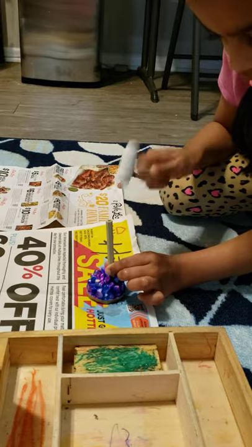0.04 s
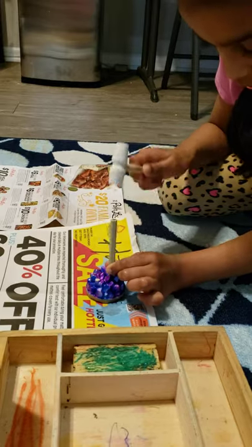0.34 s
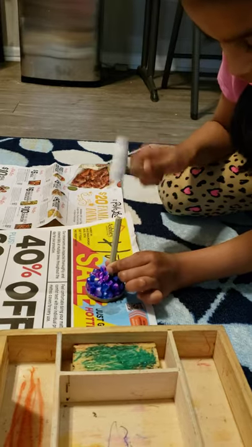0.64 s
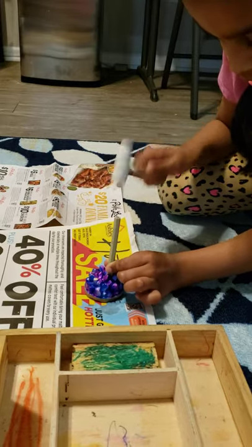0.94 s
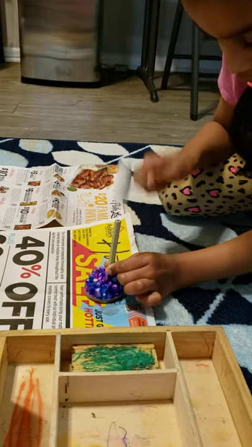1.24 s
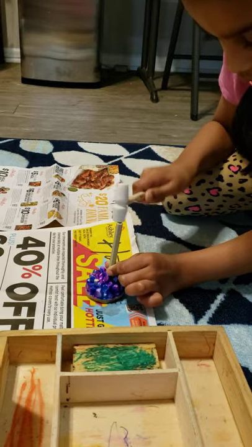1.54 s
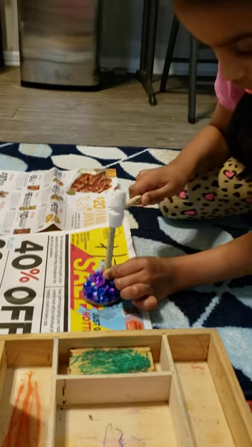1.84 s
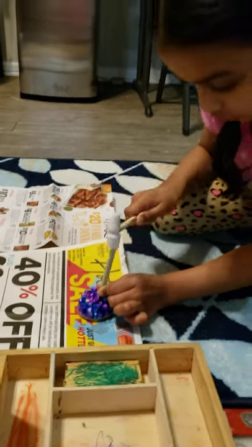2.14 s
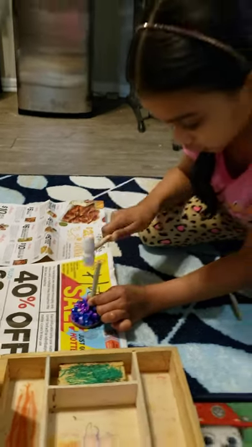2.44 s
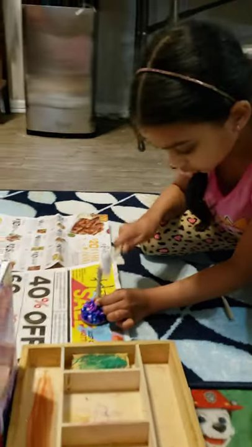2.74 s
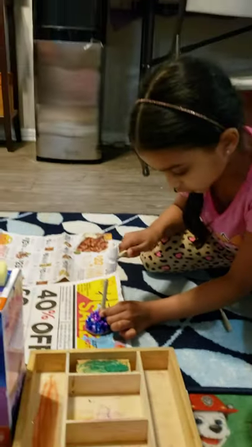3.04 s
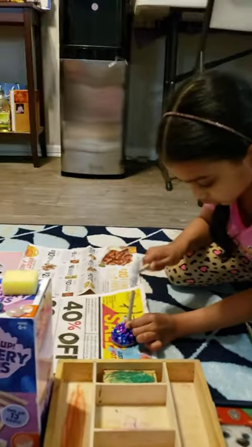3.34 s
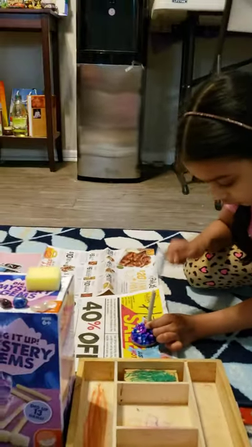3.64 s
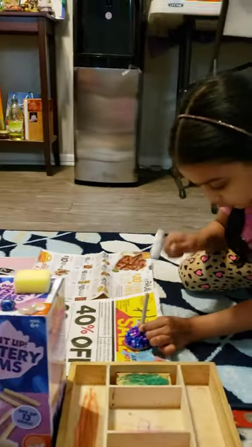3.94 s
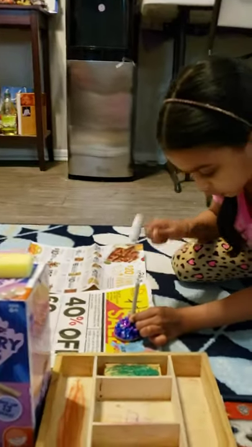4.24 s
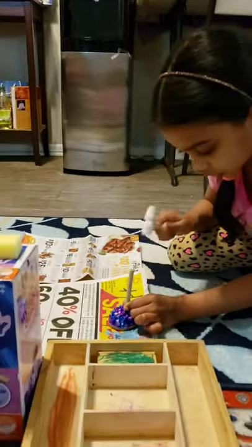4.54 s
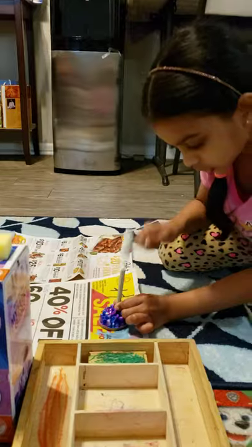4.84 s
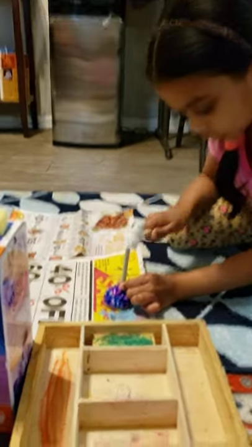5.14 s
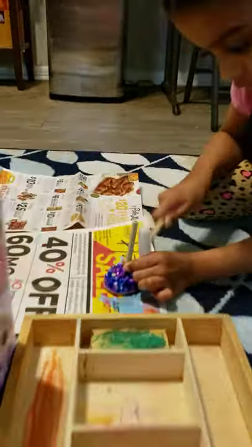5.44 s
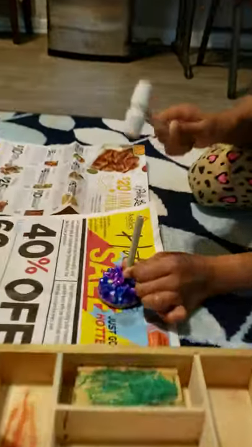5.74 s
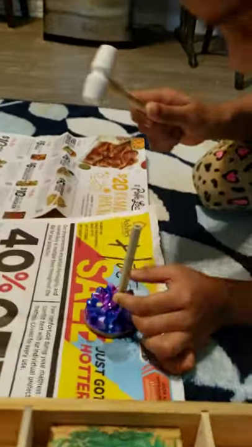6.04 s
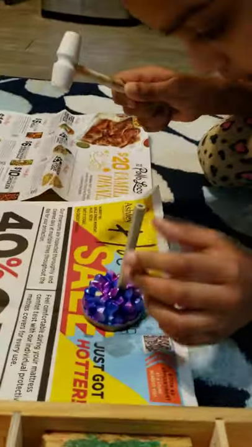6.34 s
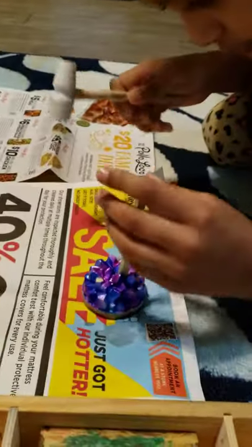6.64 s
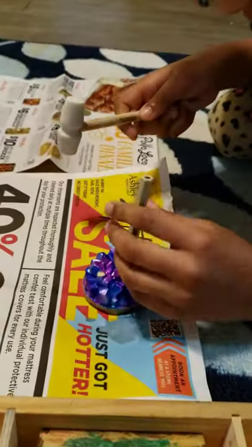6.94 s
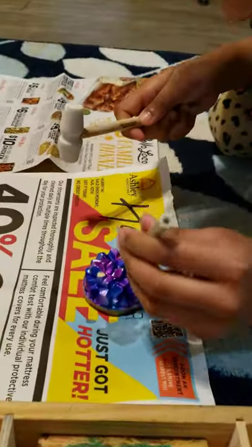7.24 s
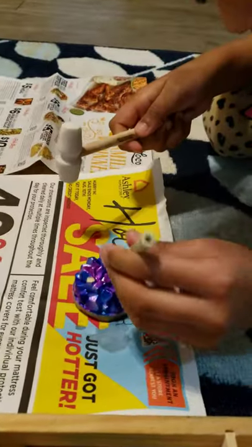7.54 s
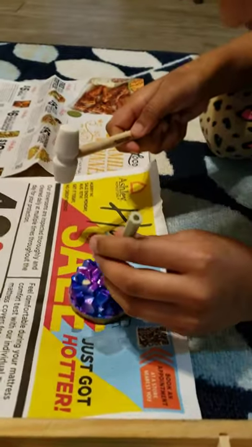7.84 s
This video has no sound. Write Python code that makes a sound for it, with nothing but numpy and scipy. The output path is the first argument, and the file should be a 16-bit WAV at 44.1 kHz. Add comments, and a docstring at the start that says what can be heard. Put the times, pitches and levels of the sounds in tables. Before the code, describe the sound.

Over a low room rumble, quick light knocks come from a small mallet striking a chisel set in clay, with bright ticks, crumbling grit and soft thuds through the floor. After one short break with a sleeve rustle, the steady tapping resumes and ends in a brief chisel rattle. Only quiet touches and scrapes on newspaper remain. The microphone is close, in a home living space with mild reverberation.

```python
"""Over a low room rumble, a small mallet taps a chisel into damp clay lying on newspaper and a rug.
Each impact excites the modes of floor, wooden tools and chisel; crumbs crackle and the living room
reverberates. Between taps the block slides on the paper and sleeves rub. Near 5.5 s the last blow
glances off and the chisel rattles. Then only small handling sounds, cloth and the rumble remain."""
import sys
import numpy as np
from scipy import signal
from scipy.fft import rfft, irfft
from scipy.io import wavfile

SR = 44100
rng = np.random.default_rng(int(sys.argv[2]) if len(sys.argv) > 2 else 0)


def generate_wav(signal):
    """Clip the signal to [-1, 1] and save it as 16-bit WAV at the path in sys.argv[1]."""
    frames = np.transpose(np.atleast_2d(signal))
    scaled = np.clip(frames, -1, 1) * 32767
    pcm = np.round(scaled).astype(np.int16)
    wavfile.write(sys.argv[1], SR, pcm)


N = 352800
TAP_SIZE, TAIL_SIZE = SR // 3, SR // 2   # samples

# Coherence of the diffuse field. Each row: frequency in Hz, left-right correlation.
COHERENCE = [(60, 0.96), (170, 0.97), (350, 0.59), (700, 0.45), (1400, -0.34), (3000, -0.055),
             (16000, -0.006)]


def from_db(db):
    """Amplitude grows tenfold every 20 dB."""
    return 10 ** (np.asarray(db) / 20)


def rms_one(x):
    """Power normalisation: scale to rms 1."""
    return x / np.sqrt(np.mean(x ** 2) + 1e-20)


def unit_blow(x):
    """Energy normalisation: scale to the energy of 10 ms at rms 1."""
    return x / np.sqrt(np.mean(np.sum(x ** 2, axis=-1)) / (.01 * SR) + 1e-20)


def at_hz(points, hz):
    """Interpolation of a table on a logarithmic frequency axis."""
    frequencies, values = np.transpose(points)
    return np.interp(np.log(hz), np.log(frequencies), values)


def panned(sound, pan_db):
    """A level difference gives direction: left exceeds right by pan_db."""
    return sound * from_db(pan_db * np.array([[.5], [-.5]]))


def add(out, s, sound):
    """Superposition: mix in a stereo sound at s seconds, even if it begins before zero."""
    i = round(s * SR)
    out[:, max(i, 0):i + sound.shape[1]] += sound[:, max(-i, 0):N - i]


def resonate(x, resonances):
    """Damped resonators in parallel filter the excitation, their signs alternating."""
    out = 0
    for k, (hz, width_hz, db) in enumerate(resonances):
        b, a = signal.iirpeak(hz, hz / width_hz, fs=SR)
        out = out + (-1) ** k * from_db(db) * signal.lfilter(b, a, x)
    return out


def grains(size, per_s, size_db):
    """Shot noise: independent impulses of random sign, their levels scattered by size_db."""
    born = rng.random(size) < per_s / SR
    strength = from_db(size_db * np.minimum(rng.exponential(1, size), 3))
    return born * strength * rng.choice([-1, 1], size)


def noise_bands(size):
    """A diffuse field is coherent only in the bass: yield (Hz, stereo band) of white noise."""
    edges_hz = np.geomspace(22, 17500, 25)
    mid, side = rfft(rng.standard_normal((2, size)))
    bins = np.arange(len(mid)) * SR / size
    for low, high in zip(edges_hz, edges_hz[1:]):
        hz = np.sqrt(low * high)
        alike = at_hz(COHERENCE, hz)
        pair = np.sqrt((1 + alike) / 2) * mid + np.sqrt((1 - alike) / 2) * side * [[1], [-1]]
        yield hz, irfft(pair * ((bins >= low) & (bins < high)), size)


def coloured_noise(spectrum):
    """A stationary diffuse field: stereo noise of the given spectrum at rms 1."""
    mid, side = rfft(rng.standard_normal((2, N)))
    hz = np.maximum(np.arange(len(mid)) * SR / N, 1)
    alike = at_hz(COHERENCE, hz)
    pair = np.sqrt(1 + alike) * mid + np.sqrt(1 - alike) * side * [[1], [-1]]
    return rms_one(irfft(pair * from_db(at_hz(spectrum, hz)), N))


def background(rumble_db=-57.5, hiss_hz=1880, hiss_width_hz=430, hiss_db=-78):
    """Stationary noise: the broadband rumble of the home and a narrowband appliance hiss."""
    # Each row: frequency in Hz, relative spectral density in dB.
    rumble_spectrum = [(15, -50.5), (25, -41), (48, -10), (61, -2.5), (79, -7.5), (112, -2.5), (270, -24.5),
                       (354, -31.5), (734, -47), (1130, -42), (1290, -51.5), (1740, -25.5), (2760, -59),
                       (6210, -44.5), (9570, -58), (12500, -44), (16000, -68.5)]
    b, a = signal.iirpeak(hiss_hz, hiss_hz / hiss_width_hz, fs=SR)
    white = rng.standard_normal((2, N))
    hiss = rms_one(signal.lfilter(b, a, signal.lfilter(b, a, white)))
    return from_db(rumble_db) * coloured_noise(rumble_spectrum) + from_db(hiss_db) * hiss


def room_tail(build_s=0.0018, ceiling_s=.019, ceiling_width_s=0.003, ceiling_gain=0.56):
    """Reverberation builds up, swells with the ceiling reflection and decays band by band."""
    # Each row: frequency in Hz, reverberant level in dB against the direct sound.
    band_levels = [(80, -4.5), (200, 0), (420, 2), (650, 5.5), (900, -5), (1600, 3.5), (3000, 3.5),
                   (5400, -6), (7500, -2.5), (10000, -3.5), (13000, -1.5), (16000, -4.5)]
    # Each row: frequency in Hz, reverberation time (60 dB of decay) in seconds.
    decay_times = [(100, 0.53), (260, 0.33), (700, 0.41), (1800, 0.44), (4800, 0.44), (8000, 0.33),
                   (13000, 0.31)]
    t, out = np.arange(TAIL_SIZE) / SR, 0
    ceiling = ceiling_gain * np.exp(-((t - ceiling_s) / ceiling_width_s) ** 2)
    shape = (1 - np.exp(-t / build_s)) * (1 + ceiling)
    for hz, band in noise_bands(TAIL_SIZE):
        fade = shape * from_db(-60 * t / at_hz(decay_times, hz))
        out = out + band * fade / np.linalg.norm(fade) * from_db(at_hz(band_levels, hz))
    return out


def some_tail(tails):
    """Echo paths change as hands and microphone move: a random blend of room tails."""
    blend = rng.standard_normal(len(tails))
    return np.tensordot(blend / np.linalg.norm(blend), tails, 1)


def standing_waves():
    """Reflections between floor, walls and furniture reinforce a few room modes."""
    # Each row: frequency in Hz, level in dB against the direct sound, 60 dB decay time in seconds.
    room_modes = [(167.1, -3.5, 0.65), (333, -7.5, 0.28), (493, 11, 0.3), (624, 5, 0.31), (648, 10, 0.17),
                  (826, 2, 0.17), (892, 0, 0.17), (1038, 1, 0.24), (1322, 4, 0.28), (1720, 9, 0.2)]
    t, out = np.arange(TAIL_SIZE) / SR, 0
    for hz, db, t60 in room_modes:
        fade = from_db(-60 * t / t60)
        # the two sides differ more in phase at higher pitch
        phase = rng.uniform(0, 2 * np.pi) + hz / 1000 * rng.standard_normal((2, 1))
        out = out + from_db(db) * 2 * fade / fade.sum() * np.sin(2 * np.pi * hz * t + phase)
    return out


def in_room(sound, tails, pan_db, standing=0):
    """The direct sound adds to its convolution with the room's impulse response."""
    out = signal.fftconvolve(sound, some_tail(tails) + standing, axes=1)
    out[:, :TAP_SIZE] += panned(sound, pan_db)
    return out


def cloth(still_db=-75.5):
    """Friction noise of sleeves and paper: each shift of the body adds power to a faint steady rub."""
    # Each row: peak time in seconds, level in dB, swell and fade times in seconds.
    shifts = [(3.2, -52, 0.11, 0.58), (5.38, -54.5, 0.37, 0.29), (5.85, -66.5, .25, 0.86),
              (7.419, -70, 0.35, 0.13)]
    # Each row: frequency in Hz, relative spectral density in dB.
    friction_spectrum = [(300, -1.5), (1000, -5.5), (2200, 1.5), (3300, -6.5), (5000, -1.5), (7000, 0),
                         (9200, -9.5), (12000, -1.5), (16000, -9.5)]
    t, power = np.arange(N) / SR, from_db(still_db) ** 2
    for s, db, swell_s, fade_s in shifts:
        swell = np.exp(-((t - s) / np.where(t < s, swell_s, fade_s)) ** 2)
        power = power + (from_db(db) * swell) ** 2
    return np.sqrt(power) * coloured_noise(friction_spectrum)


def rubbing(tails):
    """Stick-slip friction: block and fingers slide on paper, their tiny slips driving one resonance."""
    # Each row: start and length in seconds, level in dB, centre and bandwidth in Hz.
    slides = [(1.995, 0.06, -50.5, 1010, 258.5), (1.996, 0.055, -55, 2600, 2486),
              (5.949, 0.064, -66, 4830, 2200), (6.229, 0.082, -66, 7000, 2500),
              (6.282, 0.037, -58.5, 6060, 2500), (7.245, 0.066, -68.5, 4600, 1770),
              (7.327, 0.098, -72.5, 4700, 1500)]
    out = np.zeros((2, N))
    for s, length_s, db, hz, width_hz in slides:
        swell = np.sin(np.pi * np.minimum(np.arange(TAP_SIZE) / SR / length_s, 1))
        slips = rms_one(resonate(grains(TAP_SIZE, per_s=990, size_db=0), [(hz, width_hz, 0)]))
        add(out, s, from_db(db) * in_room(slips * swell * np.ones((2, 1)), tails, pan_db=0))
    return out


def clack(resonances, tails, contact_s, pan_db, crumb_db, crumbs_per_s=700, crumb_fade_s=0.027):
    """Source and filter: a hand-damped body colours a rough contact, falling crumbs and their echoes."""
    t = np.arange(TAIL_SIZE) / SR
    contact = rng.standard_normal((2, TAIL_SIZE)) * t / contact_s * np.exp(-t / contact_s)
    crumbs = grains(TAIL_SIZE, crumbs_per_s, size_db=0.5) * np.exp(-t / crumb_fade_s)
    impact = unit_blow(resonate(contact, resonances))
    crackle = from_db(crumb_db) * unit_blow(resonate(crumbs, resonances))
    body_response = unit_blow(resonate(signal.unit_impulse(TAP_SIZE), resonances))
    room = signal.fftconvolve(some_tail(tails), [body_response], axes=1)[:, :TAIL_SIZE]
    return panned(impact + crackle, pan_db) + room


def handling(tails):
    """Light impacts excite damped resonances: bright in the loose chisel, duller in a soft touch."""
    # The chisel bounces on the clay or shifts in the fingers. Each row: start in seconds, level in dB.
    clicks = [(0.044, -47.5), (0.479, -43.5), (0.748, -38), (2.723, -32.5), (2.727, -36.5), (2.745, -33.5),
              (5.47, -28), (5.481, -33), (5.5454, -36.5), (5.586, -47), (7.129, -66)]
    # Each row: resonance frequency and bandwidth in Hz, relative level in dB.
    loose_chisel = [(3500, 2700, -14.5), (6540, 1000, -3.5), (7330, 390, 4), (11300, 2800, -4.5),
                    (14600, 3200, -12)]
    # Tools and block touch. Each row: start in seconds, level in dB before softening, resonance in Hz.
    touches = [(0.703, -55.5, 625), (5.479, -44, 262), (5.784, -60.5, 385), (6.287, -52.5, 6340),
               (6.29, -67, 800), (7.248, -67, 4370), (7.689, -67.5, 1120)]
    out = np.zeros((2, N))
    for s, db in clicks:
        click = clack(loose_chisel, tails, contact_s=0.00051, pan_db=3, crumb_db=-14.5)
        add(out, s, from_db(db) * click)
    for s, db, hz in touches:
        touch = clack([(hz, hz / 2, 0)], tails, contact_s=0.0011, pan_db=-4.0, crumb_db=-22)
        soften = signal.butter(1, min(2 * hz, SR / 3), fs=SR, output="sos")
        add(out, s, from_db(db) * signal.sosfilt(soften, touch))
    return out


def struck(modes, detune, vary_db, spread_rad, rise_s):
    """Free vibration: modes decay exponentially, and the grip varies their pitch and strength."""
    t, out = np.arange(TAP_SIZE) / SR, 0
    for hz, db, t60 in modes:
        pitch, strength, phase = rng.uniform(-1.14, 1, 3)
        side_phases = spread_rad * phase * np.array([[.5], [-.5]])
        wave = np.sin(2 * np.pi * hz * (1 + detune * pitch) * t + side_phases)
        out = out + wave * from_db(db + vary_db * strength - 60 * t / t60)
    return unit_blow(out * (1 - np.exp(-t / rise_s)))


def floor_thump(cut_hz=100):
    """The floor's modes ring under the rug; so small a patch radiates no deep bass."""
    # Each row: frequency in Hz, relative level in dB, 60 dB decay time in seconds.
    floor_modes = [(111.6, -27, .12), (163.3, 4, 0.029), (167.8, -22.5, 0.26), (235.7, -12, 0.11),
                   (315, -6.5, 0.029)]
    vibration = struck(floor_modes, detune=0.016, vary_db=4.5, spread_rad=0.41, rise_s=0.00019)
    return signal.sosfilt(signal.butter(3, cut_hz, "high", fs=SR, output="sos"), vibration)


def wooden_knock(weight_db, firm_weight_db=-29, firm_knock_db=-30.6, growth=1.13, rise_per_db=.004):
    """The tools' modes depend on contact: a lighter blow seats the chisel less and knocks higher."""
    # Each row: frequency in Hz for a firm blow, relative level in dB, 60 dB decay time in seconds.
    wood_modes = [(634, -20.5, 0.044), (874, -0.5, 0.023), (982, 2.5, 0.017), (1150, 4, 0.0072),
                  (1522, -5.5, 0.01), (1940, -16.5, 0.0032), (2460, -14, 0.0068)]
    lighter_db = firm_weight_db - weight_db
    raised = [(hz * (1 + rise_per_db * lighter_db), db, t60) for hz, db, t60 in wood_modes]
    knock = struck(raised, detune=.025, vary_db=2.5, spread_rad=1.8, rise_s=.00012)
    return -from_db(firm_knock_db - growth * lighter_db) * knock


def clay_grit(tails):
    """Fracture: crumbling clay excites broad, heavily damped resonances."""
    # Each row: frequency and bandwidth in Hz, relative level in dB.
    clay = [(1530, 600, -1.5), (2435, 320, 0), (3840, 3200, -6)]
    return clack(clay, tails, contact_s=0.00035, pan_db=0.5, crumb_db=-1.5)


def chisel_ring(tails, pan_db, tip_db=-5, beaming=0.2):
    """The shaft resonates; the tip's bright tick is directional, louder as the chisel moves right."""
    # Resonances of shaft and tip. Each row: frequency and bandwidth in Hz, relative level in dB.
    shaft = [(4185, 480, -4), (4956, 710, -1), (5680, 420, 1), (6310, 276, 0), (7200, 1430, -7.5)]
    tip = [(10770, 3300, 6.4), (13430, 1400, 12), (13300, 760, 0.5), (14800, 3600, 8.1)]
    ring = clack(shaft, tails, contact_s=0.00047, pan_db=pan_db / 2, crumb_db=-13)
    tick = clack(tip, tails, contact_s=0.00061, pan_db=pan_db, crumb_db=-10.5)
    return ring + from_db(tip_db - beaming * pan_db) * tick


def mallet(tails, floor_lag_s=.0015):
    """Momentum transfer: each blow excites tools, clay and chisel, and a moment later the floor."""
    # Each row: start in seconds, then levels in dB of weight on the floor, chisel ring and clay grit.
    blows = [(-0.017, -38, -32.5, -46), (0.226, -41, -35.5, -40.5), (0.4601, -36.5, -38, -40),
             (0.7417, -33.5, -36, -43.5), (1.051, -43.5, -46, -49.5), (1.3204, -32, -35, -38),
             (1.5616, -31.5, -33, -40), (1.821, -31.5, -27.5, -37), (2.092, -30, -25.5, -36),
             (2.3842, -29.5, -28.5, -37.5), (2.6964, -31, -30.5, -44.5), (3.2988, -31.5, -30, -39),
             (3.5367, -29.5, -27, -36.5), (3.8221, -30, -29.5, -36), (4.1519, -35, -33.5, -46.5),
             (4.4184, -31.5, -30, -40.5), (4.6573, -29, -29.5, -37), (4.915, -29.5, -28.5, -38.5),
             (5.1846, -28.5, -30.5, -35.5), (5.466, -49.5, -31.5, -36.5)]
    # The chisel's place as the microphone moves. Each row: time in seconds, tip's left-right ratio in dB.
    chisel_path = [(0, 10), (2.1, -7.5), (3.5, -12.5), (4.5, 0), (5.5, -4)]
    out, standing = np.zeros((2, N)), standing_waves()
    for s, weight_db, ring_db, grit_db in blows:
        pan_db = np.interp(s, *np.transpose(chisel_path))
        thump = from_db(weight_db) * floor_thump()
        knock = wooden_knock(weight_db)
        add(out, s + floor_lag_s, in_room(thump, tails, pan_db=-1.7, standing=standing))
        add(out, s, in_room(knock, tails, pan_db=0, standing=standing))
        add(out, s, from_db(grit_db) * clay_grit(tails))
        add(out, s, from_db(ring_db) * chisel_ring(tails, pan_db))
    return out


def scene():
    """Superposition of taps, handling, friction and background in one room."""
    tails = np.array([room_tail(), room_tail(), room_tail()])
    return mallet(tails) + handling(tails) + rubbing(tails) + cloth() + background()


def record(dry, low_cut_hz=22, high_cut_hz=15900, dip_hz=9200, dip_width_hz=2000, dip_depth=0.099):
    """The microphone's frequency response is band-limited, with a shallow dip in the treble."""
    b, a = signal.iirpeak(dip_hz, dip_hz / dip_width_hz, fs=SR)
    coloured = dry - dip_depth * signal.lfilter(b, a, dry)
    coloured = signal.sosfilt(signal.butter(2, low_cut_hz, "high", fs=SR, output="sos"), coloured)
    return signal.sosfilt(signal.ellip(10, .2, 80, high_cut_hz, fs=SR, output="sos"), coloured)


dry = scene()
out = record(dry)
generate_wav(out)
```